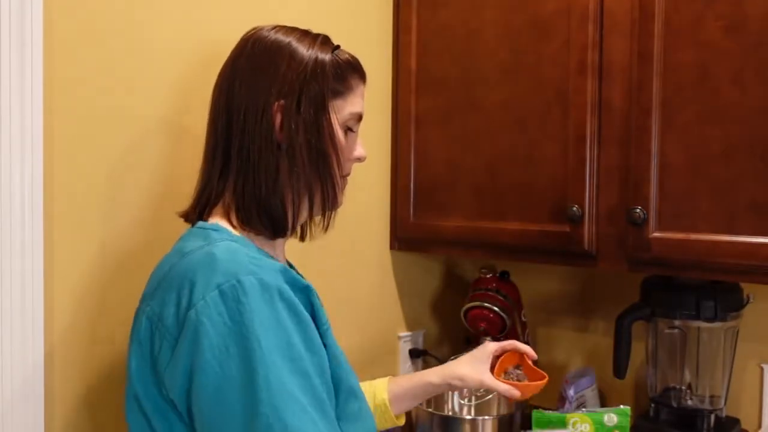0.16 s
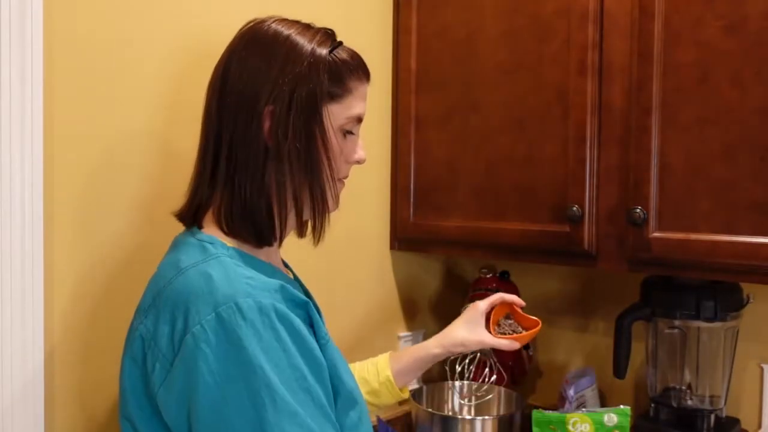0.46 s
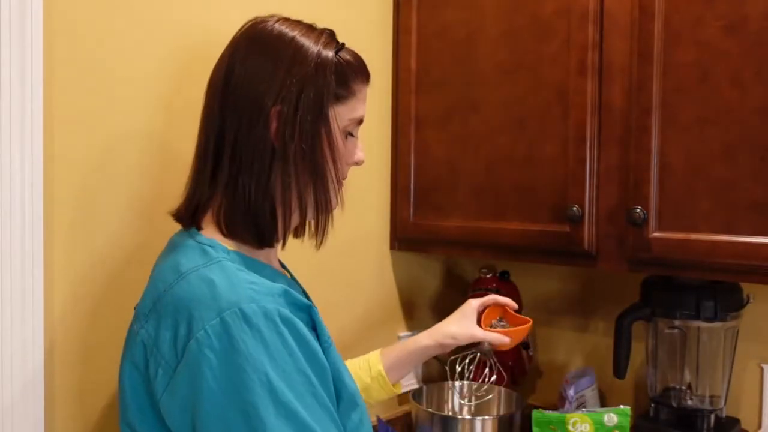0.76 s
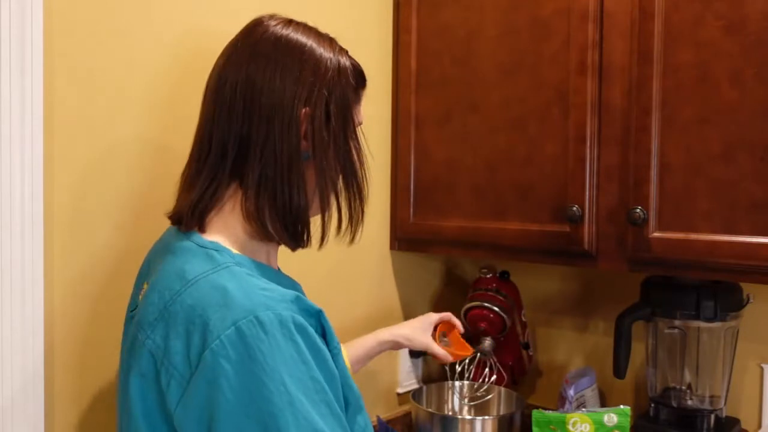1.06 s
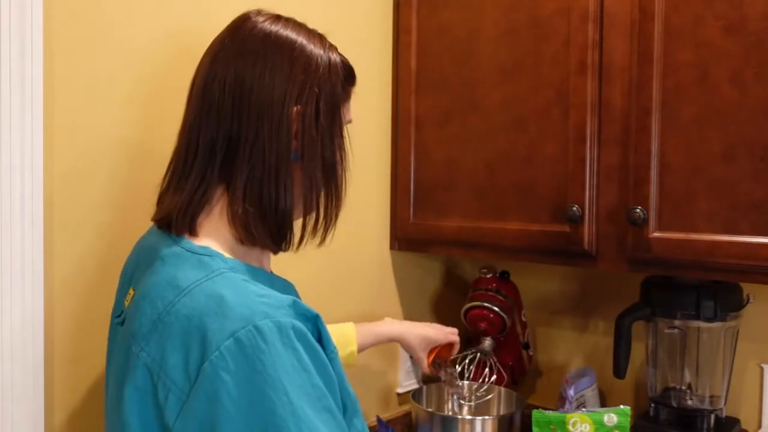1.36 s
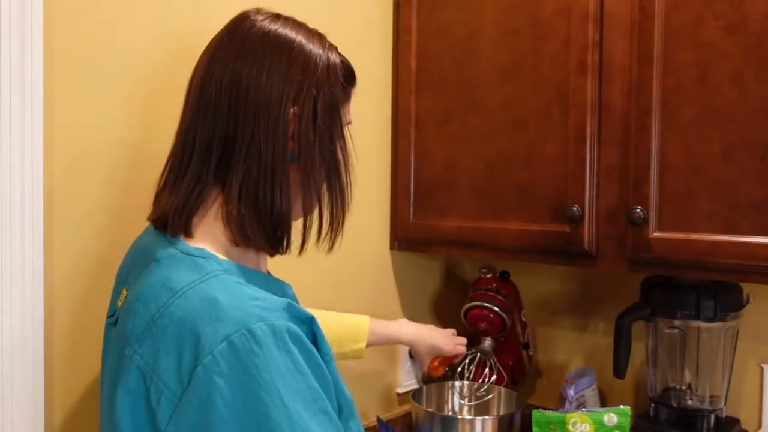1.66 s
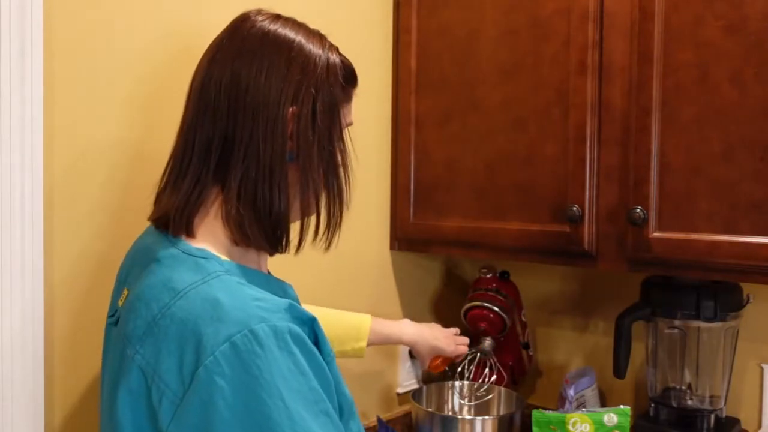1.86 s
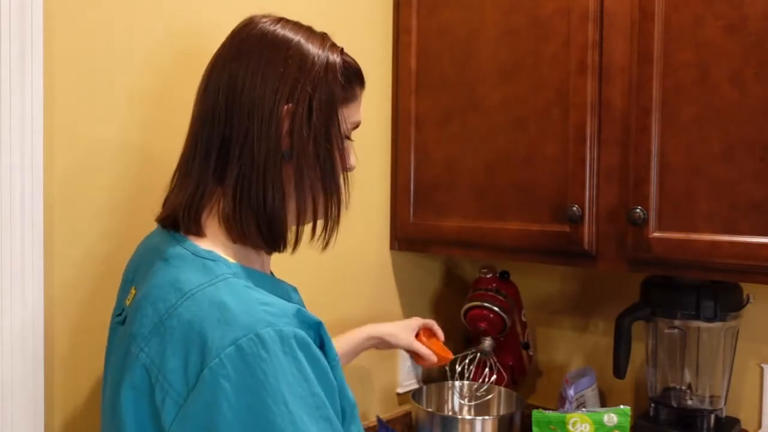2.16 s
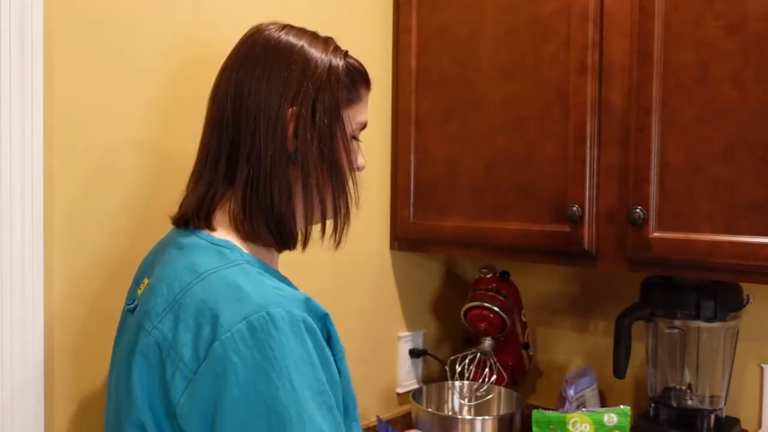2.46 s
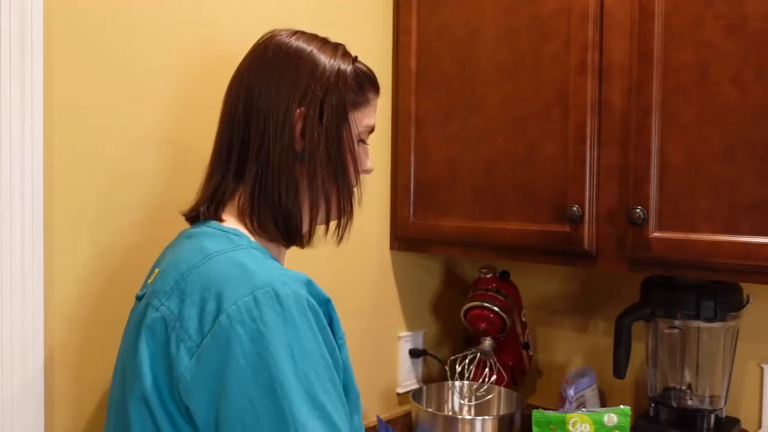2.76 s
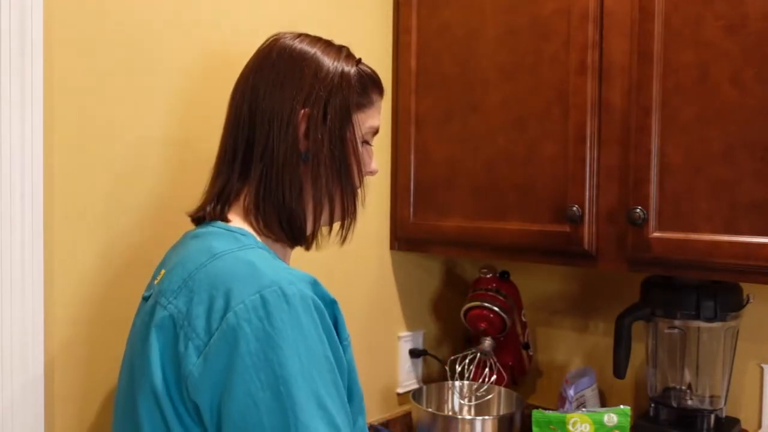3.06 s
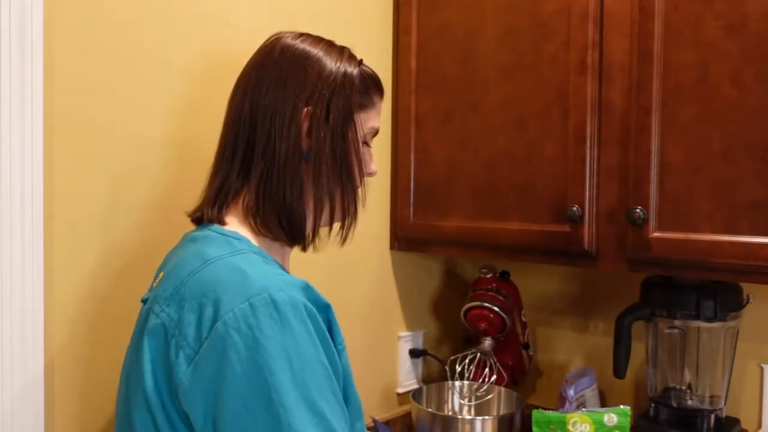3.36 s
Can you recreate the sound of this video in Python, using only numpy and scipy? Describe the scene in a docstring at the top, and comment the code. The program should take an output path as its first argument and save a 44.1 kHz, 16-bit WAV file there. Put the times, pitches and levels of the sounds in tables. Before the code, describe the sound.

Dry cocoa nibs are poured into a steel mixing bowl in a small, live kitchen. A stiff pouch crackles until about 0.6 s; nibs tick on a whisk at 1.3 s, scrape along the cup, then patter brightly in clumps from 1.5 to 1.9 s. Faint crackles return from 2.3 s; the cup knocks at 2.7 s, wobbles rapidly at 2.9-3.1 s, and crinkling continues over faint air noise.

```python
"""A stiff pouch crackles first; then a few dry cocoa nibs tick on a whisk, and the rest slide out of
a small cup and patter into a steel mixer bowl in clumps. The cup knocks and wobbles to rest on a counter
while the pouch crackles again, in a small, live kitchen with faint air noise. Random contacts excite the
nibs and film, shaped by spectra and modes; force pulses excite the cup and counter; the cup's brush on
the whisk is a sum of sines. Random reflections add the kitchen."""
import sys
import numpy as np
from scipy import signal
from scipy.fft import rfft, irfft
from scipy.io import wavfile
from scipy.ndimage import uniform_filter1d, minimum_filter1d

SR = 44100
rng = np.random.default_rng(int(sys.argv[2]) if len(sys.argv) > 2 else 0)


def unload_wav(signal):
    """Save mono or channel-first audio to the path in sys.argv[1] as 16-bit WAV at rate SR, clipped to [-1, 1]."""
    wavfile.write(
        sys.argv[1],
        SR,
        np.round(np.clip(np.atleast_2d(signal).T, -1, 1) * 32767).astype(np.int16),
    )


N = 154350  # samples, 3.5 s

NIBS_PER_S, NIB_SCATTER_DB = 640, 6
CLUMP_RISE_S = 0.0008
TRICKLE_PER_S, TRICKLE_SCATTER_DB = 75, 5  # mean rate on each spot
# Clumps of nibs landing in the bowl. Each row: start in seconds [s], relative level [dB],
# length of the flurry [s], treble tilt [dB per octave].
CLUMPS = [(0.888, -40, 0.015, 7), (1.5145, -15, 0.0027, 0), (1.521, -14, 0.0024, -1.5),
          (1.536, -28, 0.0033, -8), (1.563, -18, 0.011, 3), (1.587, -13.5, 0.0081, -4),
          (1.594, -3.5, 0.002, 2), (1.599, -9.5, 0.0061, -1), (1.621, -20, .002, 0.5),
          (1.648, -20, 0.016, -2.5), (1.677, -12, 0.0054, -2.5), (1.692, -23.5, 0.0067, 1),
          (1.713, -31, 0.0035, -2), (1.722, -18.5, 0.0082, 2), (1.7543, -17.5, 0.0074, 1),
          (1.765, -21, 0.0053, 4), (1.856, -22, 0.0024, 0), (1.864, -27, 0.0032, -2)]
# Trickle between the clumps. Each row: time [s], relative level [dB].
TRICKLE = [(1.5, -41), (1.525, -25), (1.56, -21), (1.62, -29), (1.7, -15.5), (1.745, -23), (1.8, -35),
           (1.88, -66)]


def bowl(count=5):
    """Impact excitation: light, hard nibs land on different spots and excite only the steel's high modes."""
    out = np.zeros(N)
    for _ in range(count):
        trickle = stream(TRICKLE, TRICKLE_PER_S, TRICKLE_SCATTER_DB)
        out += through(trickle, strike_spot(tilt_db=-2.5)) / np.sqrt(count)
    for start, db, length, tilt_db in CLUMPS:
        clump = burst(db, length, NIBS_PER_S, NIB_SCATTER_DB, first=0.4, rise=CLUMP_RISE_S)
        add(out, start, signal.fftconvolve(clump, strike_spot(tilt_db)))
    return amp(-2.5) * out


NIB_RING_S = 0.00096  # decay constant of the dense, quickly damped ring of the steel under one nib
SPOT_COLOUR_DB = 2.5  # standard deviation of the random colour points
# Average spectrum of the struck bowl. Each row: frequency [Hz], relative level [dB].
BOWL_SPECTRUM = [(60, -79), (250, -37), (1000, -38), (2800, -29), (4000, -21.5), (4700, -13.5), (5150, -4),
                 (5800, -0.5), (7500, 1), (8800, -6.5), (10100, -11), (11000, -14.5), (15500, -19.5)]


def strike_spot(tilt_db, order=14):
    """Modal participation: each spot on the bowl favours its own groups of modes."""
    centres = np.geomspace(4000, 16000, order)
    colour = list(zip(centres, SPOT_COLOUR_DB * rng.standard_normal(order)))
    return unit(signal.fftconvolve(dense_ring(BOWL_SPECTRUM, NIB_RING_S), tick(colour, tilt_db)))


# Flow of nibs out of the cup. Each row: time [s], relative level [dB].
SLIDE_FLOW = [(1.24, -46), (1.3, -52), (1.35, -75), (1.40, -34), (1.425, -30.5), (1.47, -32), (1.53, -35),
              (1.58, -43), (1.62, -73)]
# Spectrum of the scrape. Each row: frequency [Hz], relative level [dB].
SLIDE_SPECTRUM = [(120, -34), (200, -23), (424, 1), (569, -24), (821, -6), (899, -14), (1840, 0.5),
                  (2130, -3.5), (3620, -0.5), (16000, -8)]
# Modes heard in the scrape. Each row: frequency [Hz], relative level [dB], 60 dB decay time [s].
SLIDE_MODES = [(388, -11, 0.33), (439, -12, 0.17), (1810, -11, .15), (1910, -18, .15), (2335, -9.5, 0.11),
               (3660, -4.5, 0.11)]


def slide():
    """Granular friction: the heap scrapes along the tilted cup in many tiny impacts and rings its modes."""
    rub = stream(SLIDE_FLOW, 3000, 3.3)
    scrape = amp(0.5) * through(rub, tick(SLIDE_SPECTRUM))
    ringing = amp(-8) * through(rub, ring(SLIDE_MODES))
    return scrape + ringing


# First nibs on the whisk. Each row: start in seconds [s], relative level [dB], length of the flurry [s].
WHISK_HITS = [(1.273, -23, 0.0036), (1.3045, -19, 0.0074), (1.3234, -18, 0.013), (1.342, -25.5, 0.011)]
# Spectrum of the ticks. Each row: frequency [Hz], relative level [dB].
WHISK_SPECTRUM = [(180, -70), (300, -43), (978, -46), (1250, -14.5), (1610, 2), (2320, -14.5), (2750, -11),
                  (3080, 3.5), (3600, -10.5), (4400, -1.5), (5400, -11), (6740, 0), (11900, -11.5),
                  (16000, -23)]
# Modes of the whisk. Each row: frequency [Hz], relative level [dB], 60 dB decay time [s].
WHISK_MODES = [(1510, -10, .11), (1656, -4.5, 0.17), (2992, 4, 0.069), (4409, 4.5, 0.16), (4730, -3, 0.31),
               (6000, -3, .08), (6570, 9, .1), (7800, 1, 0.13)]


def whisk():
    """Impulse response: the first few nibs tick against the wires and set their modes ringing."""
    hits = np.zeros(N)
    for start, db, length in WHISK_HITS:
        add(hits, start, burst(db, length, 1200, NIB_SCATTER_DB, first=0.21))
    ticks = amp(-3.0) * through(hits, tick(WHISK_SPECTRUM))
    ringing = amp(-9) * through(hits, ring(WHISK_MODES))
    return ticks + ringing


BRUSH_S, BRUSH_DB, BRUSH_LENGTH_S = 1.692, -26, 0.027  # start, relative level, length of the push
# Partials of the rubbed tone. Each row: frequency [Hz], relative level [dB].
BRUSH_TONES = [(1515, -2.5), (2085, -16), (2980, -18.5)]


def brush():
    """Friction excitation: the tilted cup brushes the whisk once in a tone with two higher partials."""
    out = np.zeros(N)
    t = np.arange(int(BRUSH_LENGTH_S * SR)) / SR
    tone = sum(amp(db) * np.sin(2 * np.pi * hz * t) for hz, db in BRUSH_TONES)
    pressure = np.sin(np.pi * t / BRUSH_LENGTH_S) ** 2
    add(out, BRUSH_S, amp(BRUSH_DB) * np.sqrt(2) * pressure * tone)
    return out


RING_HZ = 1590  # pitch at which the modes are listed
RING_RISE_S = 0.0018
RIM_S, RIM_DB = 2.8955, -21.5  # the rim cracks down once: start, relative level
# Knocks of the cup as it lands and wobbles. Each row: start in seconds [s], relative level [dB],
# decay constant of the contact force [ms], extra level of the ring [dB], pitch of the ring [Hz].
KNOCKS = [(2.714, -9.5, 0.043, 0, 1548), (2.735, -20, .04, 2.5, 1490), (2.752, -17.5, 0.11, 0.5, 1548),
          (2.792, -22.5, 0.014, 1.5, 1524), (2.846, -21.5, 0.038, -7.5, 1536), (2.896, -10, .04, -1, 1606),
          (2.912, -12, 0.11, 10.5, 1643), (2.936, -11, 0.062, -5, 1660), (2.953, -10.5, 0.039, 5.5, 1555),
          (2.971, -14, 0.11, 13, 1599), (2.997, -23.5, 0.089, 8.5, 1547), (3.021, -30, 0.086, 18.5, 1589),
          (3.044, -35, 0.092, 22, 1544), (3.069, -38.5, 0.091, 20.5, 1620), (3.092, -37, .1, 16, 1597),
          (3.119, -41.5, 0.082, 15, 1554), (3.143, -44, .1, 13, 1640)]
# Modes of the cup at RING_HZ. Each row: frequency [Hz], relative level [dB], 60 dB decay time [s].
CUP_MODES = [(1016, -16.5, 0.11), (1382, -5.5, 0.043), (1463, -8, 0.047), (1587.4, 5.5, 0.05),
             (1658, -6.5, 0.14), (1966, -15, 0.11), (4250, -15.5, 0.045), (4600, -22, .08),
             (6480, -17.5, 0.034)]
# Spectrum of the rim crack. Each row: frequency [Hz], relative level [dB].
RIM_SPECTRUM = [(100, -58), (1500, -17), (2600, 6.5), (3600, 6), (4100, 2), (5000, -19), (9000, -20),
                (15000, -30)]


def cup():
    """Modal synthesis: each knock rings the cup, its pitch shifting as it rocks; the rim adds one crack."""
    out = np.zeros(N)
    for start, db, contact_ms, ring_db, pitch in KNOCKS:
        modes = []
        for hz, level, t60 in CUP_MODES:
            # only the lower modes follow the pitch
            shifted = hz * pitch / RING_HZ if hz < 2 * RING_HZ else hz
            modes.append((shifted, level, t60))
        body = ring(modes)
        body = body * (1 - np.exp(-np.arange(len(body)) / SR / RING_RISE_S))
        add(out, start, signal.fftconvolve(push(db + ring_db, contact_ms), body))
    crack = dense_ring(RIM_SPECTRUM, decay_s=0.0053)
    add(out, RIM_S, amp(RIM_DB) * np.sqrt(SR / 100) * crack)
    return out


CLACK_RING_S = 0.00058  # decay constant of the dense ring of the counter under the cup
# Spectrum of the clack. Each row: frequency [Hz], relative level [dB].
CLACK_SPECTRUM = [(50, -70), (110, -54), (250, -32), (520, -10), (1000, -3.5), (1250, -3), (1450, 5),
                  (2050, 0), (2500, -8), (3200, -17), (3900, -22), (5500, -22), (9000, -25), (15000, -38)]


def counter():
    """High modal density: each knock of the cup clacks on the counter, too crowded in modes for a pitch."""
    out = np.zeros(N)
    for start, db, contact_ms, _, _ in KNOCKS:
        clack = dense_ring(CLACK_SPECTRUM, CLACK_RING_S)
        add(out, start, signal.fftconvolve(push(db, contact_ms), clack))
    return out


def push(db, contact_ms):
    """Contact duration sets bandwidth: the force of a longer knock is duller."""
    force = np.exp(-np.arange(1, SR // 100) / SR / (contact_ms / 1000))
    return force / force.sum() * amp(db) * np.sqrt(SR / 100)


CREASES_PER_S, CREASE_SCATTER_DB = 1600, 4
# Single crackles. Each row: start in seconds [s], relative level [dB], length of the flurry [s],
# treble tilt [dB per octave], time constant of the rise [ms].
CRACKLES = [(0.023, -28.5, 0.003, -0.5, 0.69), (0.099, -29.5, 0.011, -0.5, 2.6),
            (0.128, -27.5, 0.011, -4, 3.7), (0.142, -20.5, 0.0012, -1.5, 0.36),
            (0.153, -22.5, 0.0018, -3.5, 0.34), (0.165, -23.5, 0.0077, -1.5, 2),
            (0.175, -19, 0.007, .5, 1.1), (0.189, -16.5, .0012, 0, .25), (0.203, -21.5, .002, 1.5, 0.48),
            (0.233, -23.5, 0.0014, 2.5, .3), (0.21, -23, 0.0084, 0, 2), (.222, -18, 0.0092, 2, 1),
            (0.252, -26.5, 0.0021, -2, 0.59), (0.28, -22.5, 0.0047, -2, .5), (0.331, -28, 0.0032, -2, .6),
            (0.436, -21.5, 0.0066, 0, 5.5), (0.4869, -12.5, 0.0035, 1, 3.5),
            (0.5837, -24, 0.00086, -0.5, .2), (.602, -14.5, 0.0069, 0.5, 0.3),
            (2.289, -36, 0.0029, 0.5, 0.32), (2.363, -28, 0.0042, 0.5, 0.72), (2.388, -32, 0.0056, -3, 2.5),
            (2.403, -25.5, 0.0045, 0.5, 0.61), (2.569, -24.5, 0.0043, 1.5, 0.46),
            (2.997, -20.5, 0.0043, 3, 0.21), (3.166, -31.5, 0.003, 2, 1), (3.195, -27, 0.0087, -2, 5),
            (3.315, -28, 0.0027, -4.5, 0.3), (3.339, -24.5, 0.0033, 0, 0.25),
            (3.462, -34.5, 0.0025, -1.5, 0.56)]
# Steady crumpling, one curve per grip. Each row of a curve: time [s], relative level [dB].
CRUMPLES = [
    [(0, -35), (.1, -36), (.16, -22.5), (.22, -31), (.27, -25.5), (.335, -33), (.355, -52), (.43, -41.5),
     (.47, -36), (.56, -49), (.66, -54), (.74, -47)],
    [(2.17, -53), (2.3, -47.5), (2.335, -31.5), (2.36, -40.5), (2.41, -35.5), (2.45, -38), (2.55, -44.5),
     (2.62, -38.5), (2.71, -38.5)],
    [(3.0, -32), (3.08, -35.5), (3.15, -40), (3.22, -36.5), (3.29, -40.5), (3.36, -41), (3.42, -49),
     (3.5, -39)],
]
# Spectrum of the crackles. Each row: frequency [Hz], relative level [dB].
POUCH_SPECTRUM = [(59, -56), (100, -50.5), (260, -27), (330, -21), (502, -9.5), (650, -7.5), (1100, -3),
                  (1250, -2.5), (1760, 1), (3700, -4.5), (9020, -19), (13500, -33), (16000, -42)]
# Spectrum of the gripped film. Each row: frequency [Hz], relative level [dB].
FILM_SPECTRUM = [(59, -82), (100, -64), (500, -13.5), (1080, -3.5), (1250, -3.5), (2270, -3), (9020, -17.5),
                 (14700, -34), (16000, -47)]


def pouch():
    """Snap-through buckling: creases snap singly in the gripped film and in flurries when it buckles."""
    snaps = sum(stream(curve, CREASES_PER_S, CREASE_SCATTER_DB) for curve in CRUMPLES)
    out = through(snaps, tick(FILM_SPECTRUM, tilt_db=0.5))
    for start, db, length, tilt_db, rise_ms in CRACKLES:
        first = 0.5 * np.exp(-rise_ms)  # a slow swell has a weak first snap
        flurry = burst(db, length, CREASES_PER_S, CREASE_SCATTER_DB, first=first, rise=rise_ms / 1000)
        add(out, start, signal.fftconvolve(flurry, tick(POUCH_SPECTRUM, tilt_db)))
    return out


ROOM_TONE_DB = -48
# Spectrum of the air noise. Each row: frequency [Hz], relative level [dB].
ROOM_TONE = [(18, -50), (30, -68), (194, -12.5), (252, -2), (303, 0.5), (328, -3.5), (404, -5.5),
             (584, -5.5), (801, 0.5), (913, -7), (1040, 2), (1460, -8), (1590, -3.5), (4530, -15),
             (16000, -25.5)]


def room_tone():
    """Stationary filtered noise: the faint steady air noise of the house."""
    mid, side = (amp(ROOM_TONE_DB) * through(rng.standard_normal(N), tick(ROOM_TONE)) for _ in range(2))
    return stereo(mid, side, pan_db=0.5, side_db=2.5)


EARLY_S, BUILD_S = 0.0082, 0.0071  # time constants: decay of the early returns, build-up of the tail
TAIL_DB = -1
# Reverberation of the kitchen. Each row: frequency [Hz], 60 dB decay time [s].
ROOM_T60 = [(250, 0.81), (800, 0.49), (2000, 0.36), (6000, 0.44), (14000, 0.24)]


def reflections(early_db):
    """Room impulse response: early returns from counter and cupboards, then a diffuse, decaying tail."""
    t = np.arange(SR * 3 // 4) / SR
    hz = np.fft.rfftfreq(len(t), 1 / SR)
    noise = rfft(rng.standard_normal(len(t)))
    centres = np.geomspace(125, 16000, 8)
    tail = np.zeros(len(t))
    for centre, weights in zip(centres, np.eye(len(centres))):
        # overlapping triangular bands, each with its own decay
        band = irfft(noise * on_log(hz, list(zip(centres, weights))), len(t))
        tail += band * np.exp(-np.log(1000) * t / on_log(centre, ROOM_T60))
    early = contacts(len(t), 2500, 0.71) * np.exp(-t / EARLY_S) * (t > 0.0006)
    built_tail = tail * (1 - np.exp(-t / BUILD_S))
    return amp(early_db) * even(early) + amp(TAIL_DB) * even(built_tail, width_hz=86)


def place(x, wet_db, early_db, pan_db, side_db):
    """Superposition of direct and reflected sound: a source at its own spot in the kitchen."""
    mid, side = (amp(wet_db) * through(x, reflections(early_db)) for _ in range(2))
    return stereo(x + mid, side, pan_db, side_db) / np.sqrt(1 + amp(wet_db) ** 2)


# Stereo width. Each row: frequency [Hz], side level before each source's own offset [dB].
WIDTH = [(100, -24), (400, -8.5), (2000, -9.5), (6500, -9), (8500, -14.5), (14000, -9)]


def stereo(mid, side, pan_db, side_db):
    """Mid-side sum: the side signal is weighted by frequency, and a level difference pans the result."""
    hz = np.fft.rfftfreq(N, 1 / SR)
    side = irfft(rfft(side) * amp(on_log(hz, WIDTH) + side_db), N)
    left = (mid + side) * amp(pan_db / 2)
    right = (mid - side) * amp(-pan_db / 2)
    return np.array([left, right])


def contacts(n, rate, scatter_db):
    """Poisson-like impacts: random tiny contacts of uneven size and either sign, rms 1."""
    hit = rng.random(n) < rate / SR
    sign = rng.choice([-1, 1], n)
    size = amp(scatter_db * np.clip(rng.standard_normal(n), -2, 2))
    return np.sqrt(n) * unit(hit * sign * size)


def burst(db, length, rate, scatter_db, first=0.4, rise=1e-5, size=4096):
    """Clustered impacts: a first contact and a flurry that swells and dies; db is energy over 10 ms."""
    t = np.arange(size) / SR
    swell = np.exp(-(t / length) ** 2 / 2) * (1 - np.exp(-t / rise))
    x = unit(contacts(size, rate, scatter_db) * swell)
    x[0] += first
    return even(x) * amp(db) * np.sqrt(SR / 100)


def stream(curve, rate, scatter_db):
    """Amplitude-modulated impacts: a run of contacts follows a level curve, silent outside it."""
    s, db = np.array(curve).T
    level = np.interp(np.arange(N) / SR, s, db, left=-np.inf, right=-np.inf)
    return contacts(N, rate, scatter_db) * amp(level)


TILT_FROM_HZ = 850


def tick(points, tilt_db=0, size=2048):
    """Minimum phase by the cepstrum: a short causal click with the given spectrum, energy 1."""
    hz = np.fft.rfftfreq(size, 1 / SR)
    octaves = np.log2(np.maximum(hz / TILT_FROM_HZ, 1))
    cepstrum = irfft(np.log(amp(on_log(hz, points) + tilt_db * octaves)))
    # fold the cepstrum onto positive times
    cepstrum[1:size // 2] *= 2
    cepstrum[size // 2 + 1:] = 0
    return unit(irfft(np.exp(rfft(cepstrum))))


def ring(modes):
    """Modal superposition: exponentially decaying sines of alternating sign, energy 1."""
    t = np.arange(SR // 2) / SR
    out = np.zeros(len(t))
    for k, (hz, db, t60) in enumerate(modes):
        mode = np.sin(2 * np.pi * hz * t) * np.exp(-np.log(1000) * t / t60)
        out += (-1) ** k * amp(db) * unit(mode)
    return unit(out)


def dense_ring(points, decay_s, size=512):
    """Statistical modes: decaying noise stands for many crowded, quickly damped modes."""
    noise = rng.standard_normal(size) * np.exp(-np.arange(size) / SR / decay_s)
    return unit(signal.fftconvolve(even(noise, width_hz=170), tick(points)))


def even(x, width_hz=500):
    """Spectral whitening: level out the broad colour but keep the fine structure; energy 1."""
    spec = rfft(x, 2 * len(x))
    power = uniform_filter1d(np.abs(spec) ** 2, int(width_hz * 2 * len(x) / SR) + 1)
    return unit(irfft(spec / np.sqrt(power + 1e-9))[:len(x)])


def through(x, response):
    """Linear convolution: pass a signal through an impulse response."""
    return signal.fftconvolve(x, response)[:N]


def add(out, at, x):
    """Superposition: mix x in at a time in seconds."""
    i = max(int(at * SR), 0)
    out[i:i + len(x)] += x[:max(N - i, 0)]


def amp(db):
    """Logarithmic level: decibels to amplitude gain."""
    return 10 ** (np.asarray(db) / 20)


def unit(x):
    """Energy normalization: scale the sum of squares to 1."""
    return x / np.sqrt(np.sum(x ** 2) + 1e-18)


def on_log(hz, points):
    """Logarithmic frequency axis: interpolate (Hz, value) points."""
    p = np.array(points, float)
    return np.interp(np.log(hz + 1), np.log(p[:, 0]), p[:, 1])


def scene():
    """Superposition of sources: pour, cup and pouch over the room tone."""
    return (place(bowl(), wet_db=-2, early_db=1.0, pan_db=-0.5, side_db=-2)
            + place(whisk() + slide(), wet_db=-1.0, early_db=-2.5, pan_db=-0.4, side_db=-4)
            + place(brush(), wet_db=-9, early_db=-10, pan_db=-0.4, side_db=0)
            + place(cup(), wet_db=-7, early_db=-9, pan_db=-1.9, side_db=2)
            + amp(-0.5) * place(counter(), wet_db=6.5, early_db=-6, pan_db=-1.2, side_db=-6.0)
            + place(pouch(), wet_db=-1.5, early_db=-2, pan_db=-1.3, side_db=-3.0)
            + room_tone())


CEILING, LIMITER_S = 0.61, 0.0015  # limiter threshold in amplitude, gain window
TOP_HZ = 16000


def record(dry):
    """Peak limiting and low-pass filtering: a fast limiter holds the highest peaks; the top is cut."""
    span = int(LIMITER_S * SR) + 1
    peak = np.abs(dry).max(0)
    gain = minimum_filter1d(np.minimum(1, CEILING / (peak + 1e-9)), span)
    limited = dry * uniform_filter1d(gain, span)
    low_pass = signal.ellip(10, 0.2, 70, TOP_HZ, fs=SR, output="sos")
    return signal.sosfilt(low_pass, limited)


dry = scene()
out = record(dry)
unload_wav(out)
```